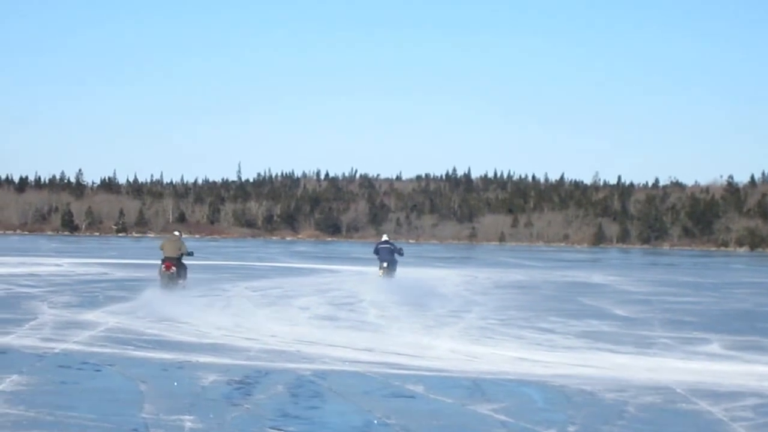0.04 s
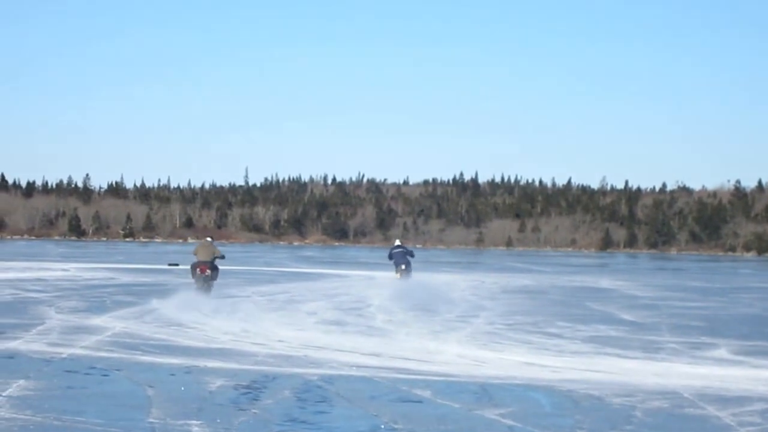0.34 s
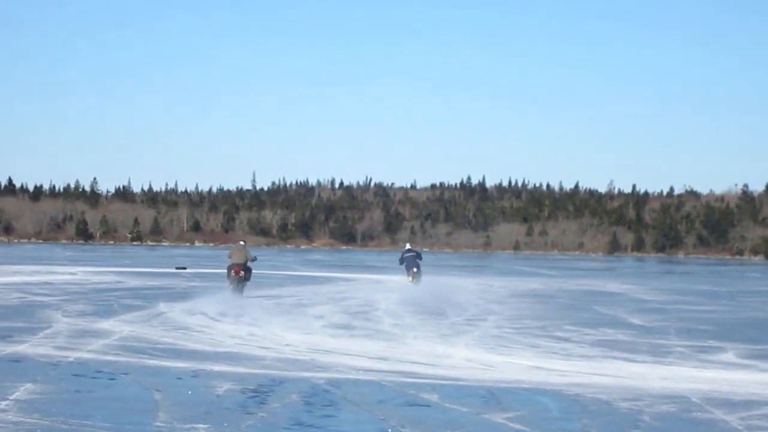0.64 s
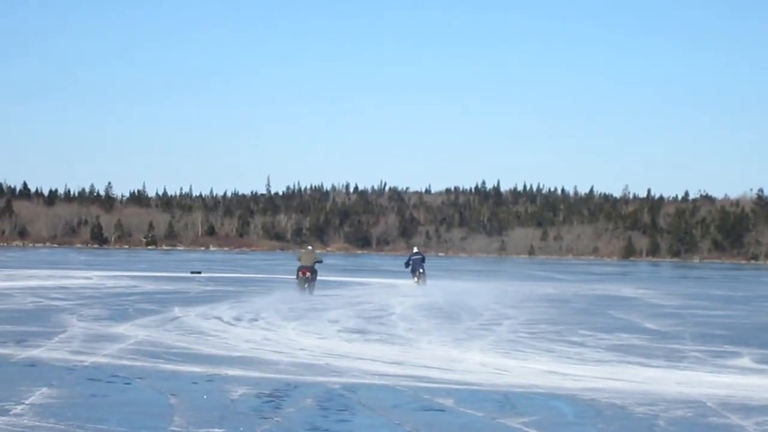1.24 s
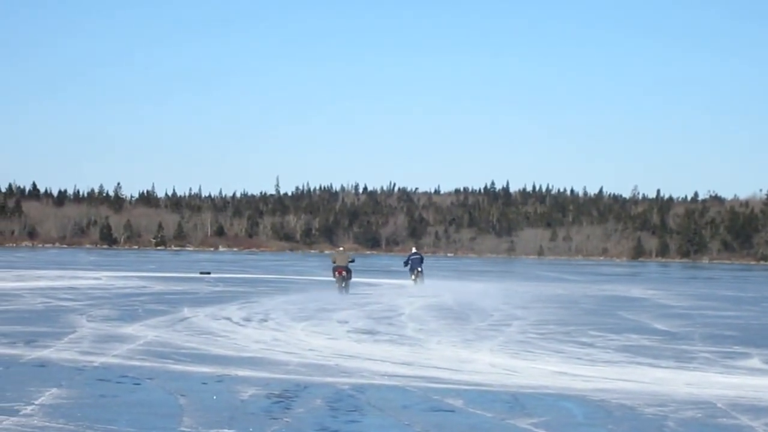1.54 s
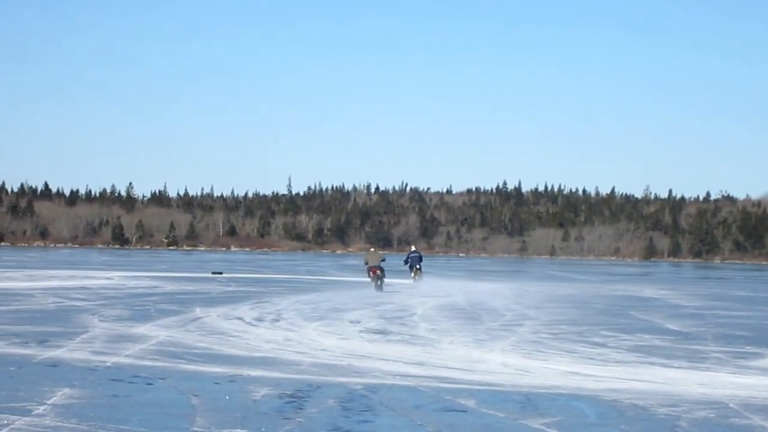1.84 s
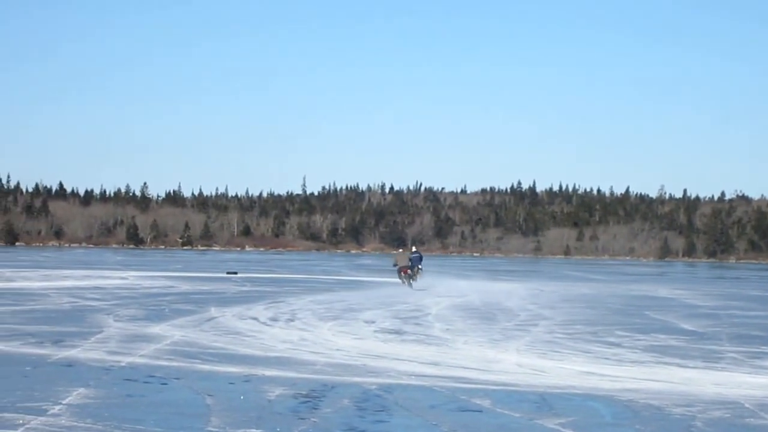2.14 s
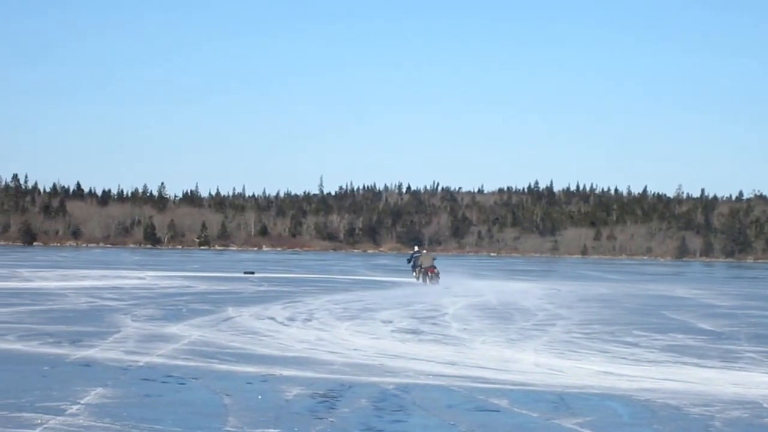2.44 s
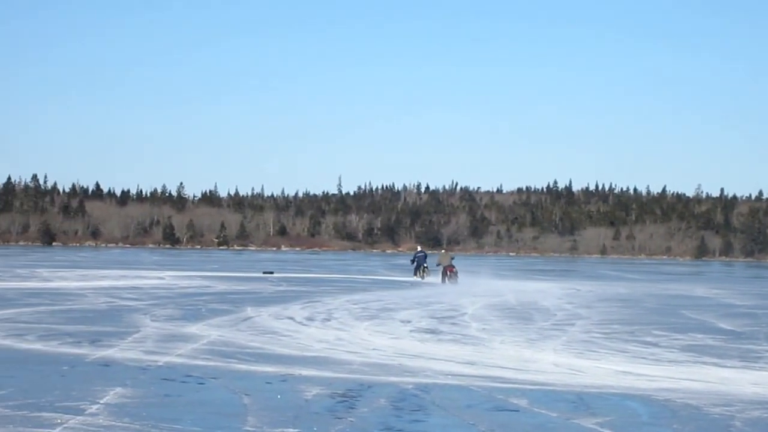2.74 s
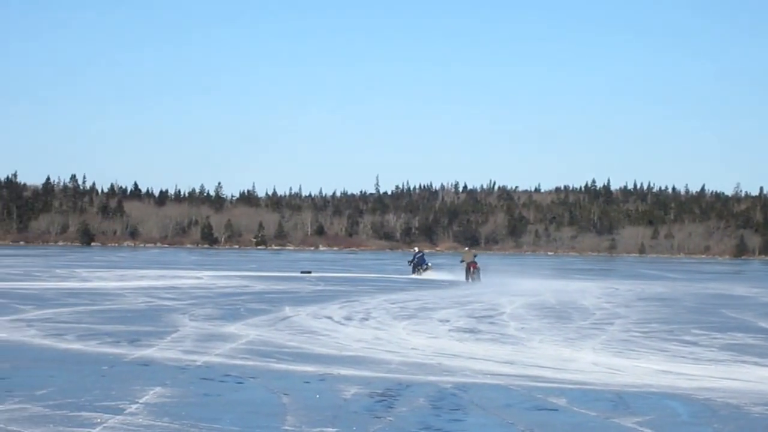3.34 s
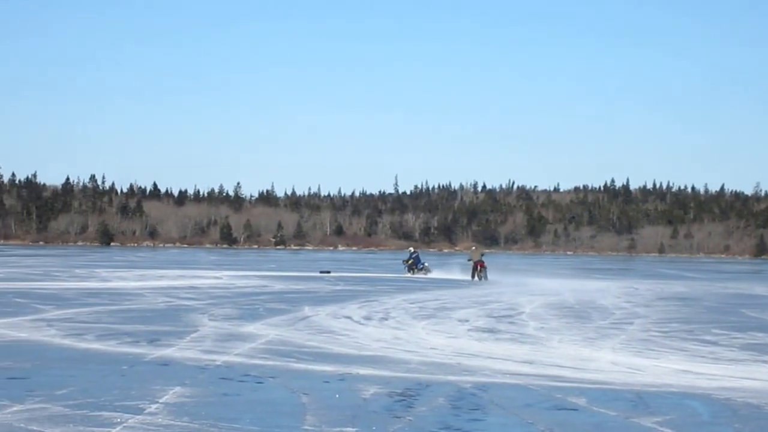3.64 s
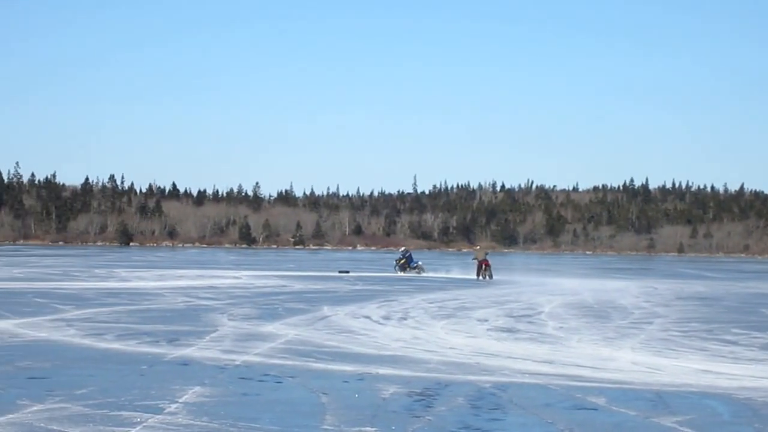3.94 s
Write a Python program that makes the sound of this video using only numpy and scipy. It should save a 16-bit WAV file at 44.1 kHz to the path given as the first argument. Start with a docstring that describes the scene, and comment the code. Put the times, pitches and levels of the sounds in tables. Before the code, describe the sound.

Two motorcycle engines, loud and rasping at first, change gear and recede over open ice, dropping to a distant putter. Beneath them is a soft tyre hiss, and low gusts of wind thump close on the microphone.

```python
"""Two single-cylinder motorcycles ride away from the microphone over a frozen lake, shifting gear.
Each firing sends a thump and a puff of rasp down the exhaust. Out on the ice the tyres hiss,
and the wooded shore answers faintly. Close up, wind buffets the two microphone ports,
each on its own, and takes over as the bikes recede."""
import sys
import numpy as np
from scipy import signal
from scipy.fft import rfft, irfft
from scipy.io import wavfile

SR = 44100
rng = np.random.default_rng(int(sys.argv[2]) if len(sys.argv) > 2 else 0)


def int16_out(signal):
    """Quantize to a 16-bit WAV file."""
    q = np.round(np.clip(np.atleast_2d(signal).T, -1, 1) * 32767)
    wavfile.write(sys.argv[1], SR, q.astype(np.int16))


N = 176400
T = np.arange(N) / SR
HZ = np.fft.rfftfreq(N, 1 / SR)


def amp(db):
    """Decibels to gain."""
    return 10 ** (np.asarray(db) / 20)


def unit(x):
    """Scales to rms 1."""
    return x / np.sqrt(np.mean(x ** 2) + 1e-20)


def curve(rows):
    """Each column of a time table, at every sample."""
    times, *columns = np.transpose(rows)
    return [np.interp(T, times, column) for column in columns]


def colour(x, spectrum):
    """Causal filter with the given spectral shape; keeps white noise at its level."""
    f, db = np.transpose(spectrum)
    gain = unit(amp(np.interp(np.log(HZ + 1), np.log(f), db)))
    cepstrum = irfft(np.log(gain), N)
    cepstrum[1:N // 2] *= 2  # fold to minimum phase
    cepstrum[N // 2 + 1:] = 0
    impulse = irfft(np.exp(rfft(cepstrum)), N)[:4096]
    return signal.fftconvolve(x, impulse)[:N]


def drift(rate_hz):
    """Smooth random motion of rms 1."""
    return unit(irfft(rfft(rng.standard_normal(N)) * np.exp(-(HZ / rate_hz) ** 2), N))


def stereo_noise(spectrum, width):
    """Coloured noise with a share of side signal."""
    mid, side = (unit(colour(rng.standard_normal(N), spectrum)) for _ in range(2))
    return np.array([mid + width * side, mid - width * side])


# Spectrum of the wind right on the microphone: f/Hz, relative level/dB
WIND_SPECTRUM = [(10, -25), (25, -5.5), (45, -0.5), (90, 2.5), (150, -0.5), (250, -11), (400, -22.5),
                 (800, -35.5), (2000, -77.5)]
# Strength of that wind: t/s, level/dB
WIND_STRENGTH = [(0, -28), (.7, -28), (1.1, -20.5), (2.8, -25.5), (3.3, -21.5), (3.7, -17), (4, -24)]

def wind():
    """Wind across the microphone: a lumpy rumble, unrelated at the two ports."""
    ports = [unit(colour(rng.standard_normal(N), WIND_SPECTRUM) * amp(2.7 * drift(14))) for _ in "LR"]
    return np.array(ports) * amp(curve(WIND_STRENGTH)[0])


# Eddies striking the microphone: t/s, length/s, level/dB, corner f/Hz, port (L or R)
EDDIES = [(0.089, 0.022, -9, 204, "R"), (0.801, 0.018, -13, 171, "R"), (1.11, 0.042, -16.5, 123.5, "R"),
          (1.151, 0.021, -11.5, 595, "R"), (1.199, 0.039, -14.5, 327, "R"), (1.33, 0.069, -15, 260, "R"),
          (1.475, 0.012, -13.5, 450, "R"), (1.484, 0.011, -9.5, 716, "R"), (1.61, 0.037, -17.5, 200, "R"),
          (1.659, 0.04, -21, 414, "R"), (1.867, 0.047, -12, 190.2, "L"), (1.997, 0.039, -13.5, 159.6, "L"),
          (2.036, 0.044, -20.5, 580, "L"), (2.062, 0.026, -11, 300, "L"), (2.29, 0.12, -17.5, 450.8, "L"),
          (2.355, 0.044, -14, 295, "L"), (2.519, .11, -18, 210, "L"), (2.67, 0.061, -11.5, 189.8, "L"),
          (3.002, 0.012, -13.5, 280, "R"), (3.104, 0.068, -14.5, 339, "R"), (3.367, 0.015, -11.5, 330, "R"),
          (3.382, 0.092, -13.5, 261, "L"), (3.565, 0.03, -11, 290, "L"), (3.629, .12, -20.5, 383, "L"),
          (3.674, 0.11, -15.5, 229.3, "R"), (3.77, .03, -17.5, 420, "L"), (3.952, 0.054, -20.5, 299, "R")]

def gusts(low_hz=51, top_hz=1300, rolloff_order=3.07, jolt_s=0.022):
    """Each eddy hits one port with a rumble and a jolt; the faster it is, the higher it reaches."""
    ports = np.zeros((2, N))
    size = 16384
    t, hz = (np.arange(size) - size // 2) / SR, np.fft.rfftfreq(size, 1 / SR)
    for centre_s, length_s, level_db, corner_hz, port in EDDIES:
        band = hz / np.hypot(hz, low_hz) / np.sqrt(1 + (hz / top_hz) ** 10)
        band /= np.sqrt(1 + (hz / corner_hz) ** (2 * rolloff_order))
        swell = np.exp(-2 * (t / length_s) ** 2)
        rumble = unit(irfft(rfft(rng.standard_normal(size)) * band) * swell)
        jolt = min(jolt_s / length_s, 1) * unit(np.fft.fftshift(irfft(band)))  # long gusts jolt less
        eddy = amp(level_db) * np.sqrt(np.mean(swell ** 2)) * unit(rumble + jolt)
        ports["LR".index(port)] += np.interp(T, centre_s + t, eddy, left=0, right=0)
    return ports


# Ticks at the microphone: t/s, relative level/dB
CLOSE_TICKS = [(1.151, -27), (3.303, -41)]

def ticks(decay_s=0.00014):
    """Tiny dry clicks, very close."""
    envelope = sum(amp(db) * (T >= s) * np.exp(-abs(T - s) / decay_s) for s, db in CLOSE_TICKS)
    return envelope * rng.standard_normal((2, N)) / 2


def shore(bikes, level_db=-19, t60_s=0.42, build_s=0.017, top_hz=1200):
    """Faint dull scatter, back from the ice and the trees along the shore."""
    t = T[:SR]
    echo = rng.standard_normal((2, SR)) * amp(-60 * t / t60_s) * (1 - np.exp(-t / build_s))
    echo = signal.lfilter(*signal.butter(1, top_hz, fs=SR), echo)
    echo = np.array([echo[0] + 0.39 * echo[1], echo[0] - 0.1 * echo[1]])  # narrow stereo image
    gain = np.sqrt(np.mean(abs(rfft(echo[0])[100:800]) ** 2))  # over 100-800 Hz
    return amp(level_db) * signal.fftconvolve(bikes, echo / gain, axes=1)[:, :N]


# Spectrum of the tyres' hiss and roar from across the lake: f/Hz, relative level/dB
ROAR_SPECTRUM = [(60, -10.5), (250, 4), (600, 2.5), (1000, -3.5), (1500, -12.5), (2300, -21), (3300, -37.5),
                 (5000, -41.5), (7000, -57.5), (11000, -57.5), (15500, -62)]
# That roar at the microphone: t/s, level/dB
ROAR_LEVEL = [(0, -32.5), (1.38, -32), (1.48, -38.5), (1.9, -39.5), (2.5, -34.5), (2.85, -38), (3.1, -35.5),
              (3.7, -40)]
# Spectrum of the ice spray: f/Hz, relative level/dB
ICE_SPECTRUM = [(1500, -20.5), (3200, 6.5), (5000, 1), (6500, -2), (9000, -12.5), (11500, -5), (15500, -25)]
# That spray at the microphone: t/s, level/dB
ICE_LEVEL = [(.5, -62.5), (1.18, -70.5), (1.26, -55.5), (1.46, -73.5), (1.9, -70.5), (2.5, -73),
             (2.92, -76), (2.98, -70.5), (3.18, -68), (3.62, -83), (4, -78.5)]

def tyres():
    """Distant roar of the tyres, near the centre, and a wide, fine spray of the ice they throw."""
    roar = stereo_noise(ROAR_SPECTRUM, width=0.21) * amp(curve(ROAR_LEVEL)[0] + 1.4 * drift(19))
    spray = stereo_noise(ICE_SPECTRUM, width=0.72) * amp(curve(ICE_LEVEL)[0] + 2.0 * drift(120))
    return roar + spray


def firings(rate_hz, uneven_db, puff_s, wobble_cycles=.0018, leak=.16):
    """A click and a dying puff of gas noise for each firing, and their mix that drives the pipe."""
    cycles = np.cumsum(rate_hz) / SR + wobble_cycles * drift(39)
    fired = np.flatnonzero(np.diff(np.floor(cycles)) > 0)
    clicks = np.zeros(N)
    clicks[fired] = amp(uneven_db * rng.standard_normal(N)[:len(fired)])
    gas_flow = signal.lfilter([1], [1, -np.exp(-1 / (puff_s * SR))], clicks) + leak
    clicks, puffs = unit(clicks), unit(gas_flow * rng.standard_normal((2, N)))
    return clicks, puffs, -clicks + .09 * puffs[0]


def pipe_echo(x, round_trip_s=0.00557, top_hz=716):
    """The pressure wave runs up and down the pipe, spreading each thump over the cycle."""
    trip = np.exp(-2j * np.pi * HZ * round_trip_s)
    reflection = .3 / (1 + (HZ / top_hz) ** 2)
    return irfft(rfft(x) * (1 + reflection / trip) / (1 + reflection * trip), N)


def silencer(x, corner_hz=600):
    """The silencer delays the bass of each thump behind its crack."""
    return irfft(rfft(x) * (corner_hz - 1j * HZ) / (corner_hz + 1j * HZ), N)


def resonance(x, hz, width_hz):
    """One ringing mode, scaled to rms 1."""
    impulse = T * np.exp(-np.pi * width_hz * T) * np.sin(2 * np.pi * hz * T)
    return unit(signal.fftconvolve(x, impulse)[:N])


# Spectrum of the gas puffs from either tailpipe: f/Hz, relative level/dB
RASP_SPECTRUM = [(100, -12), (400, 0), (900, 2), (1500, 8.5), (2000, -2), (2700, -6), (3600, -17.5),
                 (5200, -19), (7000, -26), (11000, -27), (15500, -32.5)]

def rasp(clicks, puffs, width, grit_hz=2100, fade_hz=3600, fade_s=(1.2, 1.44), fade_db=-12):
    """A clean bark in the middle range and puffs of gas above it; the treble fades with distance."""
    grit = 1 / (1 + (grit_hz / (HZ + 1)) ** 4)
    source = irfft(rfft(-clicks) * np.sqrt(1 - grit) + rfft(puffs[0]) * np.sqrt(grit), N)
    mid, side = unit(colour(source, RASP_SPECTRUM)), unit(colour(puffs[1], RASP_SPECTRUM))
    side = irfft(rfft(side) * (width + (1 - width) * grit / 2), N)
    stereo = np.array([mid + side, mid - side])
    treble = irfft(rfft(stereo) / (1 + (fade_hz / (HZ + 1)) ** 4), N)
    return stereo + treble * (amp(np.interp(T, fade_s, [0, fade_db])) - 1)


# Firing rate of the higher-revving bike: t/s, f/Hz
HIGH_BIKE_RATE = [(0.0, 82.8), (0.55, 86.3), (0.74, 83.3), (0.78, 68.9), (1.0, 70.4), (1.3, 73.2),
                  (1.41, 72.9), (1.47, 68.6), (1.62, 63.2), (2.05, 61.8), (2.35, 60.3), (2.58, 57.1),
                  (2.72, 68.6), (3.15, 65.2), (4.0, 65.1)]
# That bike at the microphone: t/s, exhaust level/dB, rasp level/dB
HIGH_BIKE_LEVELS = [(0, -25.5, -50.5), (.3, -28, -59), (.74, -31.5, -61), (.775, -33.5, -41.5),
                    (.95, -27, -46.5), (1.24, -30.5, -42.5), (1.43, -27, -39.5), (1.46, -34.5, -61),
                    (1.92, -31.5, -57), (2.5, -42, -59.5), (2.72, -34, -65), (3.25, -37.5, -61.5),
                    (4, -45, -78)]
# Spectrum of its exhaust: f/Hz, relative level/dB
HIGH_BIKE_PIPE = [(30, -45), (70, -6), (140, 0), (250, 5.5), (330, -9), (430, 2), (540, -4), (660, -3.5),
                  (790, -5.5), (950, -22), (1300, -18), (2300, -41.5), (7000, -73.5)]

def high_bike():
    """The quieter, higher-revving bike rasps and whines under load, until the throttle closes."""
    exhaust_db, rasp_db = curve(HIGH_BIKE_LEVELS)
    clicks, puffs, drive = firings(curve(HIGH_BIKE_RATE)[0], uneven_db=2.0, puff_s=0.00073)
    exhaust = unit(colour(pipe_echo(drive), HIGH_BIKE_PIPE))
    whine = amp(-0.5) * resonance(drive, hz=1138, width_hz=100)
    return amp(exhaust_db) * exhaust + amp(rasp_db) * (rasp(clicks, puffs, width=.25) + whine)


# The main bike's exhaust near the microphone: f/Hz, relative level/dB
NEAR_PIPE = [(30, -41), (57, -4), (113, 4.5), (175, 5), (283, 4), (335, -10), (366, 4.5), (400, -8),
             (460, -3), (590, -2.5), (640, -16.5), (900, -17.5), (1200, -29.5), (1600, -22.5),
             (2300, -47.5), (6000, -80.5)]
# The same exhaust from far out on the ice: f/Hz, relative level/dB
FAR_PIPE = [(30, -40.5), (55, -16.5), (110, 1), (160, -9), (220, 6), (290, -11.5), (380, -15), (490, -5.5),
            (600, -13), (770, -11.5), (950, -22.5), (1300, -26.5), (2000, -55.5), (6000, -86)]

def receding_exhaust(drive, leave_s=0.77, far_s=1.7, coast_s=2.8, turn_s=2.84, boom_hz=350):
    """The main bike's thumps pass from their near to their distant colour, duller until it turns."""
    near = unit(colour(silencer(pipe_echo(drive)), NEAR_PIPE))
    far = unit(colour(drive, FAR_PIPE))
    boom = signal.lfilter(*signal.butter(1, boom_hz, fs=SR), far)
    treble_db = np.interp(T, [turn_s - .2, turn_s], [-6.5, 3])
    far = boom + (far - boom) * amp(treble_db)
    far_share = np.interp(T, [leave_s, far_s], [0, 1])
    far_share *= 1 - .55 * np.exp(-((T - coast_s) / .1) ** 2)  # fuller as it coasts into the turn
    return (1 - far_share) * near + far_share * far


# Firing rate of the main bike: t/s, f/Hz
MAIN_BIKE_RATE = [(0.0, 53.9), (0.16, 55.1), (0.25, 57.1), (0.43, 56.5), (0.58, 58.8), (0.76, 59.6),
                  (0.91, 61.5), (1.0, 58.9), (1.45, 50.9), (1.55, 50.1), (2.0, 54.8), (2.2, 56.7),
                  (2.66, 61.7), (2.72, 60.3), (2.76, 55.6), (2.88, 49.3), (3.0, 45.2), (3.16, 48.3),
                  (3.4, 48.8), (3.7, 49.7), (4.0, 52.6)]
# That bike at the microphone: t/s, exhaust level/dB, rasp level/dB
MAIN_BIKE_LEVELS = [(0, -14.5, -32), (.12, -17.5, -42.5), (.53, -16.5, -40.5), (.7, -20.5, -46),
                    (.82, -18.5, -46), (.97, -20.5, -45.5), (1.04, -45, -46), (1.55, -28, -68),
                    (1.95, -29, -67.5), (2.2, -26.5, -61.5), (2.45, -24, -51), (2.64, -24.5, -66),
                    (2.77, -22, -61), (2.87, -25, -61), (2.97, -29.5, -63), (3.3, -28, -58.5),
                    (3.73, -28.5, -63), (4, -27, -62.5)]
# Its metallic ring while still close: t/s, level/dB
RING_LEVEL = [(.19, -50), (.28, -40.5), (.38, -37.5), (.49, -38), (.57, -52), (.74, -54), (.82, -41.5),
              (.95, -45), (1.08, -80)]
# Its nasal bark before the gear change: t/s, level/dB
BARK_LEVEL = [(.45, -73), (.56, -52.5), (.92, -40.5), (1.06, -72)]

def main_bike():
    """Loud and ringing close by; barks, shifts up, pulls again, and putters through a distant turn."""
    exhaust_db, rasp_db = curve(MAIN_BIKE_LEVELS)
    clicks, puffs, drive = firings(curve(MAIN_BIKE_RATE)[0], uneven_db=.45, puff_s=0.0028)
    exhaust = amp(exhaust_db) * receding_exhaust(drive)
    ring = amp(curve(RING_LEVEL)[0]) * resonance(drive, hz=1830, width_hz=290)
    bark = amp(curve(BARK_LEVEL)[0]) * resonance(drive, hz=1351, width_hz=130)
    return exhaust + ring + bark + amp(rasp_db) * rasp(clicks, puffs, width=.3)


def scene():
    """Bikes, echo and tyres out on the lake; wind and ticks right at the microphone."""
    bikes = main_bike() + high_bike()
    balance = amp([[-.3], [.3]])  # a touch to the right
    return (bikes + shore(bikes)) * balance + tyres() + wind() + gusts() + ticks()


def record(dry, notch_hz=7800, notch_width_hz=790, notch_db=-10, top_hz=15800):
    """The microphone's treble notch, full-scale limit and band limit."""
    notch = amp(notch_db * np.exp(-((HZ - notch_hz) / notch_width_hz) ** 2))
    heard = np.clip(irfft(rfft(dry) * notch, N), -1, 1)
    lowpass = signal.firwin(511, top_hz, window=("kaiser", 9), fs=SR)
    return signal.oaconvolve(heard, lowpass[None], "same")


dry = scene()
out = record(dry)
int16_out(out)
```